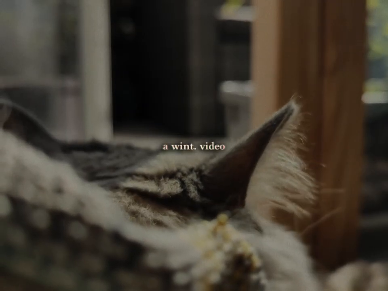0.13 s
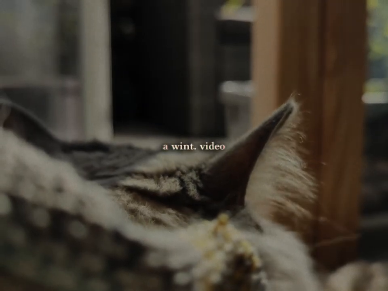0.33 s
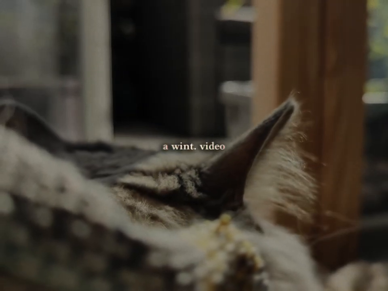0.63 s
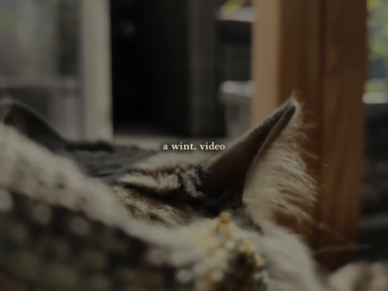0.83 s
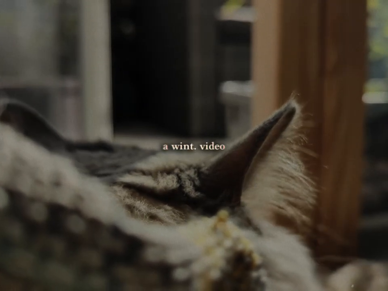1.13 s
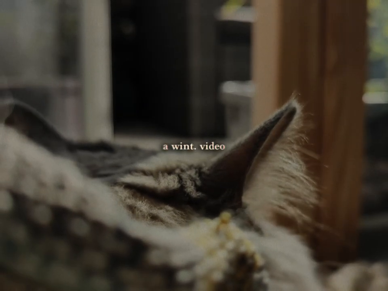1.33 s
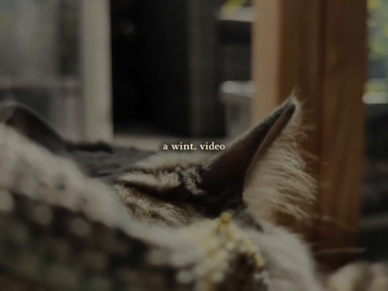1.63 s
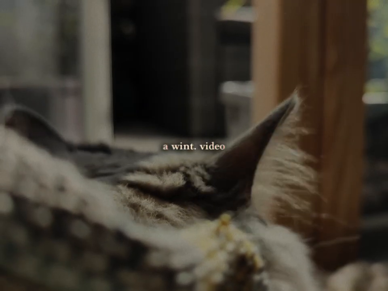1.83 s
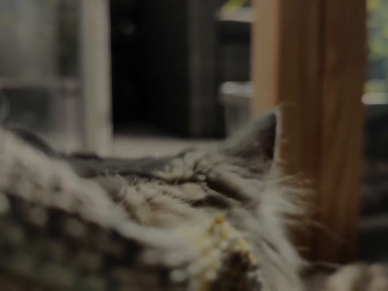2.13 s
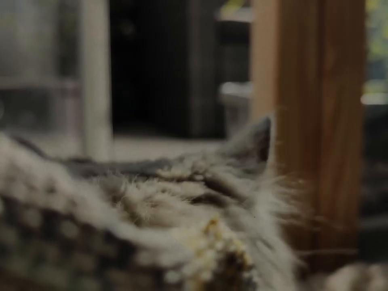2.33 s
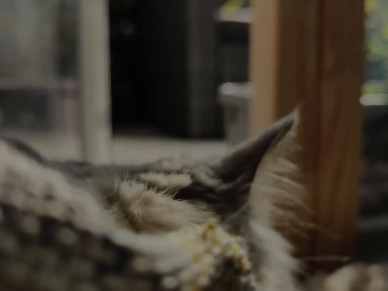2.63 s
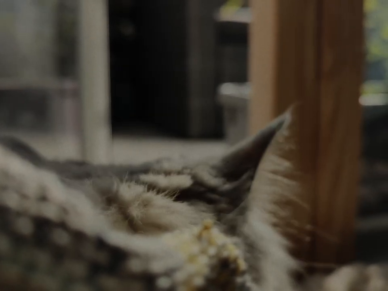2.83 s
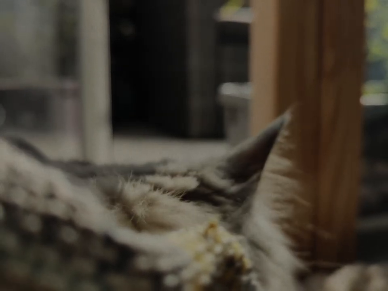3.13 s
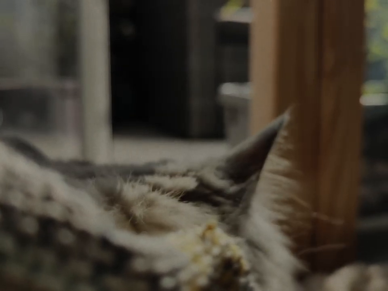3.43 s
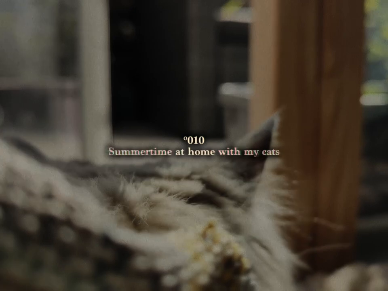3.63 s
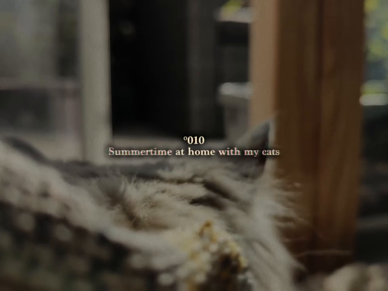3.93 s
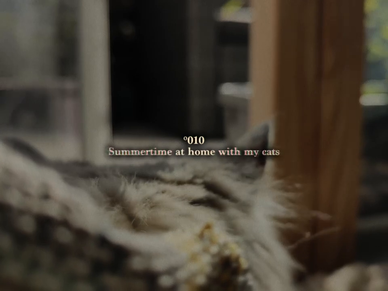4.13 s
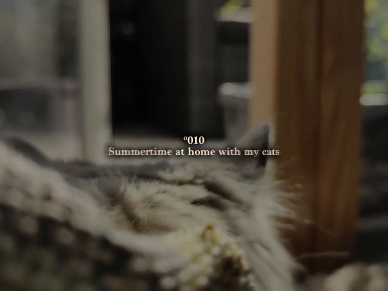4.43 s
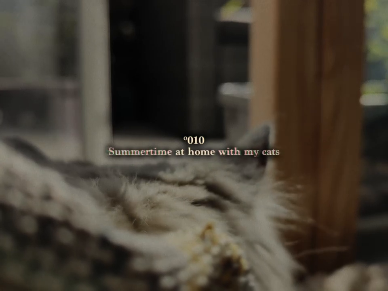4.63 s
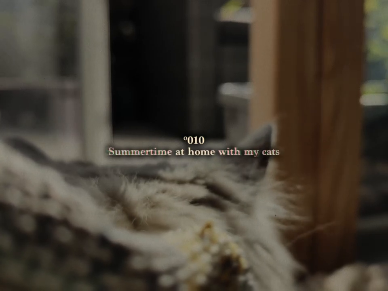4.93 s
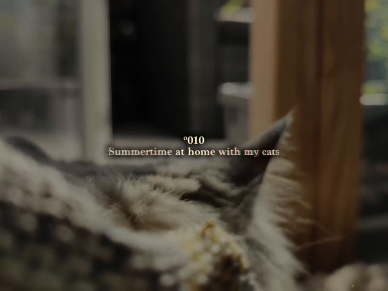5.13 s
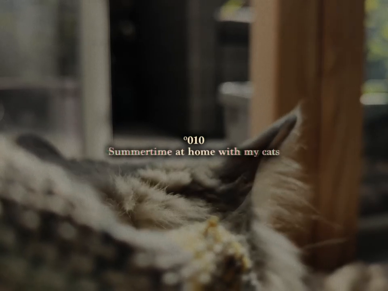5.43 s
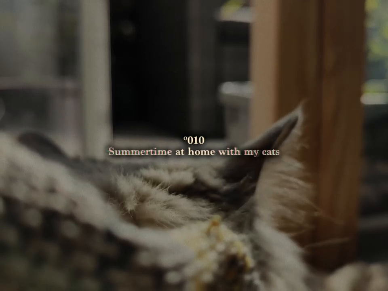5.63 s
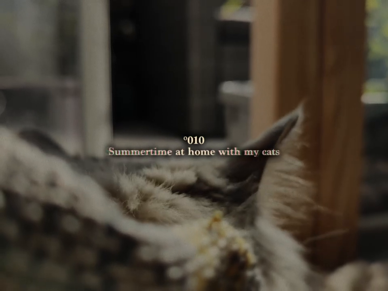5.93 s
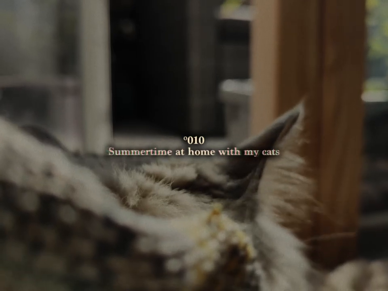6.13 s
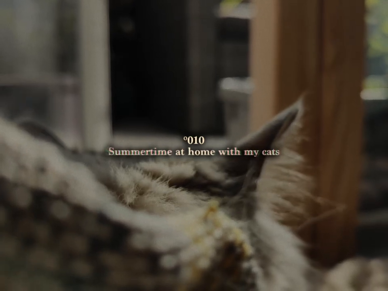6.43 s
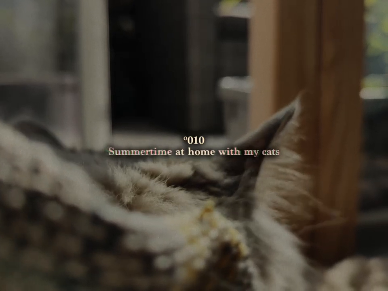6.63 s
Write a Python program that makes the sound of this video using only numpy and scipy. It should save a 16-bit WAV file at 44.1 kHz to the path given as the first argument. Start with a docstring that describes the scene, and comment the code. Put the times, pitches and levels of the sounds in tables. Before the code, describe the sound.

A low rumble of distant traffic swells slightly outdoors, with a couple of soft close bumps and a faint hiss.

```python
"""A low rumble of distant traffic, heard from a sheltered porch, swells as a heavy vehicle passes.
Tyres make the rumble, exhausts add two wavering notes, and a thin squeal comes and goes.
Close by, something softly bumps, knocks and rustles. A hollow rush sits on the right,
a whirr reaches the left side first, and a fluttering hiss lies on top.
The recorder turns its treble down a little under each surge of bass."""
import sys
import numpy as np
from scipy import signal
from scipy.fft import rfft, irfft, next_fast_len
from scipy.io import wavfile
from scipy.ndimage import uniform_filter1d, map_coordinates

SR = 44100
rng = np.random.default_rng(int(sys.argv[2]) if len(sys.argv) > 2 else 0)


def unload_wav(signal):
    """Save mono or channel-first audio to the path in sys.argv[1] as 16-bit WAV at rate SR, clipped to [-1, 1]."""
    wavfile.write(
        sys.argv[1],
        SR,
        np.round(np.clip(np.atleast_2d(signal).T, -1, 1) * 32767).astype(np.int16),
    )


N = 299747

# How loud the road is. Each row: time in seconds, then rumble, throb and growl levels in dB.
ROAD_LEVELS = [(0, -41, -43, -52), (.7, -40, -48, -52), (1.6, -40, -49, -50.5), (2.25, -40, -46, -49),
               (2.6, -42.5, -52, -49), (3.3, -38, -50, -50.5), (3.7, -41, -50, -49.5),
               (4.0, -41.5, -43.5, -47.5), (4.3, -37.5, -50, -44.5), (4.6, -37, -44, -43),
               (5.3, -41, -40, -43), (5.5, -37.5, -43.5, -51), (5.8, -36.5, -41, -51), (6.2, -38, -43, -54),
               (6.8, -38, -42.5, -53.5)]
# The tone colour of four road noises. Each row: frequency in Hz, relative level in dB.
RUMBLE_COLOUR = [(20, -48), (40, -19), (65, -3), (100, 1), (135, 0.5), (200, -5), (260, -15), (300, -18),
                 (350, -32)]
THROB_COLOUR = [(22, -22), (35, -14), (48, -9.5), (58, 4.5), (70, -23)]  # the deepest bass
GROWL_COLOUR = [(165, -19), (190, -0.5), (225, -1.5), (262, -7.5), (285, -27)]  # the heavy vehicle's rough upper sound
TYRE_COLOUR = [(260, -11), (295, -4), (325, -4), (352, 1), (385, -7.5), (430, -13.5), (480, -26.5)]  # steady, far-off tyres
# How alike left and right are. Each row: frequency in Hz, likeness (1 means the same).
ROAD_LIKENESS = [(30, 1), (70, 0.89), (130, 1), (230, 0.88), (350, 0.85)]
# Two engine notes and a ring in the whirr. Each row: time in seconds, pitch in Hz, level in dB.
LOW_ENGINE = [(0, 63.3, -48), (.3, 67.57, -40), (.85, 72, -41), (1.05, 71.85, -51), (1.25, 67.1, -38),
              (1.65, 61.95, -39), (1.95, 65.75, -50.5), (2.4, 65.8, -36.5), (3.0, 63.8, -42.5),
              (3.4, 68.4, -49.5), (4.2, 69.05, -40), (4.6, 75.24, -29.5), (4.75, 74.1, -39),
              (4.9, 74, -30.5), (5.2, 73, -36), (5.38, 70, -40.5), (5.55, 66, -32), (5.78, 74.94, -31.5),
              (5.95, 68.1, -40), (6.1, 64, -35.5), (6.3, 67.9, -39), (6.4, 68.2, -34.5),
              (6.62, 75.3, -32.5), (6.8, 76, -33.5)]
HIGH_ENGINE = [(0, 125, -45), (.4, 133, -42), (.65, 124, -47.5), (1.4, 136, -42.5), (2.3, 136, -44),
               (3.1, 122, -43), (3.75, 126, -46), (4.25, 128, -44), (4.9, 112, -43), (5.2, 116, -42.5),
               (6.3, 122, -40), (6.8, 110, -43.5)]
WHIRR_RING = [(0, 2556, -68), (.45, 2570, -65), (1.1, 2590, -73), (1.8, 2597, -75), (2.8, 2579, -68),
              (4, 2588, -71.5), (5.6, 2620, -68.5), (6.8, 2610, -68)]
# Squeals. Each row: start in seconds, seconds until fading begins, relative level in dB.
SQUEAL_BOUTS = [(3.49, .19, -68.5), (3.83, .12, -72), (4.16, .33, -64), (4.58, .24, -64.5),
                (5.02, .2, -67.5), (5.28, .13, -63.5), (5.44, .12, -65.5), (5.6, .08, -70)]
# Soft bumps. Each row: start in seconds, pitch in Hz, level in dB.
BUMPS = [(1.1965, 160, -21), (1.2105, 88, -17), (3.081, 125, -17)]
# Knocks. Each row: start in seconds, relative level in dB.
KNOCK_HITS = [(1.202, -46), (2.137, -40.5), (3.104, -38)]
# The tones in a knock. Each row: pitch in Hz, relative level in dB, seconds to fade by 60 dB.
KNOCK_TONES = [(152, 7, 0.041), (259, -17, 0.038), (467, 2, 0.039), (555, 7, 0.029), (630, -6, .03)]
# A light brush. Each row: middle in seconds, level in dB, half its length in seconds.
BRUSHES = [(.637, -53.5, .01)]
# How loud the close noises are. Each row: time in seconds, rush level in dB, whirr level in dB.
NEAR_LEVELS = [(0, -43.5, -62.5), (.7, -45, -66.5), (2, -43, -61), (3, -44.5, -63.5), (4, -43.5, -65),
               (5, -44, -61.5), (6, -44, -61), (6.8, -46, -61.5)]
# The tone colour of the other noises. Each row: frequency in Hz, relative level in dB.
RUSTLE_COLOUR = [(1200, -8), (1900, 4), (2400, 10), (3000, 0), (4200, -3), (4800, -16)]
RUSH_COLOUR = [(350, -28), (480, -12.5), (560, -8.5), (640, -8), (715, 2), (790, 0), (860, -4.5), (960, -8),
               (1050, -16.5), (1400, -31)]
WHIRR_COLOUR = [(1900, -2), (2200, 0.5), (2400, 10), (2580, 6), (2750, 5), (2950, -20)]
LEFT_HISS_COLOUR = [(250, 9), (400, 19.5), (700, 13), (1200, 8.5), (1800, 5), (3000, 7), (3450, 6),
                    (3700, 1.5), (4000, 4.5), (4700, -4.5), (7100, -1), (8100, -6), (9300, -2), (15000, -5)]
RIGHT_HISS_COLOUR = [(250, -1), (400, 16), (1300, 8.5), (1600, 7), (2300, 12), (2800, 7), (3600, 2),
                     (4500, -0.5), (6400, -3.5), (7200, -6), (8100, -12), (9300, -11), (13000, -6.5),
                     (15000, -5)]
# Which side the whirr favours. Each row: frequency in Hz, left minus right in dB.
WHIRR_BALANCE = [(2200, -12), (2500, -6), (2700, 1.5), (2950, 6)]
# Bright bands in the hiss. Each row: centre and width in Hz, then left and right strength in dB.
HISS_BANDS = [(8830, 480, -2.5, -4.5), (10170, 880, 5, 0.5), (11600, 1100, -3, -1.5)]
# The strength of the hiss's treble. Each row: time in seconds, gain in dB.
HISS_TREBLE = [(0, -55.5), (1.5, -56), (1.9, -54.5), (4.4, -55), (4.9, -56.5), (5.7, -56), (6.0, -55.5),
               (6.8, -56.5)]
# Brief swells of that treble. Each row: middle in seconds, rise in dB.
HISS_PUFFS = [(4.71, 2), (5.08, 2.5), (6.29, 3), (6.46, 1.5)]

ROAD_LAG_S, WHIRR_LAG_S = .0003, .00191  # how much later the right side hears them
SQUEAL_HZ, SQUEAL_RISE_S, SQUEAL_FADE_S = 1660, .05, .06
BUMP_RISE_S, BUMP_FADE_S, KNOCK_RISE_S = .004, .065, .0018
FLUTTER_HZ, PUFF_HALF_S = 22.5, .03
DUCK_DB_PER_DB, HIGHEST_HZ = .13, 15680


def traffic():
    """Surging road noise and engines, a touch louder and earlier on the left."""
    rumble_db, throb_db, growl_db = curves(ROAD_LEVELS)
    rumble = amp(rumble_db + 1.63 * wobble(rate=8)) * road_noise(RUMBLE_COLOUR)
    throb = amp(throb_db + .5 * wobble(rate=8)) * road_noise(THROB_COLOUR)
    growl = amp(growl_db + 1.63 * wobble(rate=8)) * road_noise(GROWL_COLOUR)
    tyres = amp(-55.5) * road_noise(TYRE_COLOUR)
    road = (rumble + throb + growl + tyres + engines()) * amp([.25, -.25])[:, None]
    return filtered(road, lambda hz: np.exp(1j * np.pi * hz * ROAD_LAG_S * np.array([[1], [-1]])))


def road_noise(colour):
    """One band of noise from the far road, nearly the same in both ears."""
    def gains(hz):
        angle = np.arccos(along(ROAD_LIKENESS, hz)) / 2
        return band(colour, hz) * [np.cos(angle), np.sin(angle)]
    shared, apart = filtered(patchy_noise(depth_db=2.8, channels=2), gains)
    return unit(np.array([shared + apart, shared - apart]))


def engines():
    """Two exhaust notes, smeared by distance and moving air; echoes make the sides differ a little."""
    low = note(*curves(LOW_ENGINE), waver_hz=5, rough=.5, rate=12)
    high = note(*curves(HIGH_ENGINE), waver_hz=9, rough=.9, rate=20)
    echo = amp(-18) * note(*curves(LOW_ENGINE), waver_hz=2.6, rough=1, rate=15)
    return np.array([low + high + echo, low + high - echo])


def squeal():
    """A thin squeal, perhaps from far brakes, comes in short bouts and wavers on each side."""
    t = np.arange(N) / SR
    bouts = np.zeros(N)
    for start, hold, db in SQUEAL_BOUTS:
        rise = np.clip((t - start) / SQUEAL_RISE_S, 0, 1)
        fade = np.exp(-np.maximum(t - start - hold, 0) / SQUEAL_FADE_S)
        bouts += amp(db) * rise * fade
    tone = note(SQUEAL_HZ, db=0, waver_hz=2, rough=.2, rate=18)
    sides_db = [[-5], [-1.5]] + .8 * np.array([wobble(rate=4), wobble(rate=4)])
    return bouts * tone * amp(sides_db)


def bumps():
    """Soft bumps: low tones that die quickly, the same on both sides."""
    out = np.zeros(N)
    for start, hz, db in BUMPS:
        age = np.maximum(np.arange(N) / SR - start, 0)
        rise = 1 - np.exp(-age / BUMP_RISE_S)
        out += rise * amp(db - 60 * age / BUMP_FADE_S) * np.sin(2 * np.pi * hz * age)
    return out


def knocks():
    """Dull little knocks, mostly on the right, each a few tones that ring very briefly."""
    out, t = np.zeros(N + SR), np.arange(SR // 10) / SR
    ring = sum(amp(db - 60 * t / fade) * np.sin(2 * np.pi * hz * t) for hz, db, fade in KNOCK_TONES)
    rise = 1 - np.exp(-t / KNOCK_RISE_S)
    for start, db in KNOCK_HITS:
        out[round(start * SR):][:len(t)] += amp(db) * rise * ring
    return out[:N] * amp([[-12], [5.5]])


def rustle():
    """A short, soft brush against something close."""
    t = np.arange(N) / SR
    swell = sum(amp(db) * np.exp(-((t - middle) / half) ** 2) for middle, db, half in BRUSHES)
    noise = unit(filtered(rng.standard_normal((2, N)), lambda hz: band(RUSTLE_COLOUR, hz)))
    return swell * noise * amp([[1.5], [-1.5]])


def rush(level_db):
    """A hollow rush on the right only; its upper and lower parts seesaw in loudness."""
    noise = unit(filtered(patchy_noise(depth_db=2.3, channels=1), lambda hz: band(RUSH_COLOUR, hz)))
    upper = treble_of(noise, from_hz=694, full_hz=856)
    lean_db = 1.2 * wobble(rate=16)
    return amp(level_db) * (amp(lean_db) * upper + amp(-lean_db) * (noise - upper)) * [[0], [1]]


def whirr(level_db):
    """A whirring noise that reaches the left side first, with a thin ring inside it."""
    def sides(hz):
        left_gain = amp(along(WHIRR_BALANCE, hz))
        right_delay = np.exp(-2j * np.pi * hz * WHIRR_LAG_S)
        return band(WHIRR_COLOUR, hz) * [left_gain, right_delay]
    ring = note(*curves(WHIRR_RING), waver_hz=42, rough=.9, rate=32) * amp([[-1.5], [1.5]])
    loudness = amp(level_db + .87 * wobble(rate=15))
    return ring + loudness * unit(filtered(patchy_noise(depth_db=3.9, channels=1), sides))


def hiss():
    """A separate speckled hiss on each side: steady lower down, flickering and fluttering on top."""
    def colour(hz):
        base = np.array([band(LEFT_HISS_COLOUR, hz), band(RIGHT_HISS_COLOUR, hz)])
        bright_power = sum(amp([[left], [right]]) ** 2 * np.exp(-4 * ((hz - centre) / width) ** 2)
                           for centre, width, left, right in HISS_BANDS)
        return np.sqrt(base ** 2 + bright_power)
    t = np.arange(N) / SR
    noise = unit(filtered(patchy_noise(depth_db=4.46, channels=2), colour))
    top = treble_of(noise, from_hz=1800, full_hz=4400)
    phase = 2 * np.pi * FLUTTER_HZ * t
    flutter = 1 + .04 * np.sin(phase) + .05 * np.sin(2 * phase + 1.1)
    puffs_db = sum(db * np.exp(-((t - middle) / PUFF_HALF_S) ** 2) for middle, db in HISS_PUFFS)
    top_db = curves(HISS_TREBLE)[0] + puffs_db + .8 * wobble(rate=38)
    return amp(-54.5) * (noise - top) + amp(top_db) * flutter * top


def note(hz, db, waver_hz, rough, rate):
    """A wavering tone; rough, from 0 to 1, is the share that is noise close to its pitch."""
    phase = 2 * np.pi * np.cumsum(hz + waver_hz * wobble(rate)) / SR
    fuzz = unit(wobble(2 * rate) * np.sin(phase) + wobble(2 * rate) * np.cos(phase))
    return amp(db) * (np.sqrt(2 - 2 * rough) * np.sin(phase) + np.sqrt(rough) * fuzz)


def patchy_noise(depth_db, channels):
    """White noise with louder and softer patches scattered over time and pitch."""
    grid = signal.stft(rng.standard_normal((channels, N)), nperseg=2048)[2]
    patches = rng.standard_normal(grid.shape)
    for axis in (1, 2):
        patches = uniform_filter1d(patches, size=3, axis=axis)
    noise = signal.istft(grid * amp(depth_db * unit(patches)), nperseg=2048)[1]
    return noise[:, :N] * signal.windows.tukey(N, 8 / N)


def wobble(rate):
    """A smooth random curve that passes through rate new values a second."""
    return map_coordinates(rng.standard_normal(int(N * rate / SR) + 4), [np.arange(N) * rate / SR])


def filtered(x, response):
    """Scale or delay each frequency by response(hz); mirrored ends prevent clicks."""
    edge = SR // 4
    x = np.pad(x, [(0, 0), (edge, edge)], mode="reflect", reflect_type="odd")
    size = next_fast_len(x.shape[1])
    return irfft(rfft(x, size) * response(np.fft.rfftfreq(size, 1 / SR)), size)[:, edge:edge + N]


def treble_of(x, from_hz, full_hz):
    """The high part of a sound, fading in between two frequencies."""
    return filtered(x, lambda hz: np.clip((hz - from_hz) / (full_hz - from_hz), 0, 1))


def band(colour, hz):
    """The gain a colour table gives each frequency, cut to zero just past its ends."""
    return amp(along(colour, hz)) * (hz > .8 * colour[0][0]) * (hz < 1.1 * colour[-1][0])


def along(rows, hz):
    """Read between a table's frequencies, spaced as musical pitch is."""
    row_hz, values = np.transpose(rows)
    return np.interp(np.log(hz + 1), np.log(row_hz + 1), values)


def curves(rows):
    """Join timed rows with straight lines, one curve for each column after the time."""
    times, *columns = np.transpose(rows)
    return [np.interp(np.arange(N) / SR, times, column) for column in columns]


def amp(db):
    """Turn decibels into a multiplier."""
    return 10 ** (np.asarray(db) / 20)


def unit(x):
    """Scale a signal to an average power of 1."""
    return x / np.sqrt(np.mean(x ** 2) + 1e-20)


def scene():
    """Add everything up as a left and a right channel."""
    rush_db, whirr_db = curves(NEAR_LEVELS)
    return traffic() + squeal() + bumps() + knocks() + rustle() + rush(rush_db) + whirr(whirr_db) + hiss()


def record(dry):
    """The treble dips in each quick surge and lifts in each lull; the very top is cut off."""
    power = uniform_filter1d(np.mean(dry, 0) ** 2, size=700)
    level_db = 10 * np.log10(np.abs(uniform_filter1d(power, size=700)) + 1e-12)
    surge_db = level_db - uniform_filter1d(level_db, size=SR // 5)
    treble = treble_of(dry, from_hz=1500, full_hz=3000)
    ducked = dry + treble * (amp(-DUCK_DB_PER_DB * surge_db) - 1)
    return filtered(ducked, lambda hz: hz < HIGHEST_HZ)


dry = scene()
out = record(dry)
unload_wav(out)
```